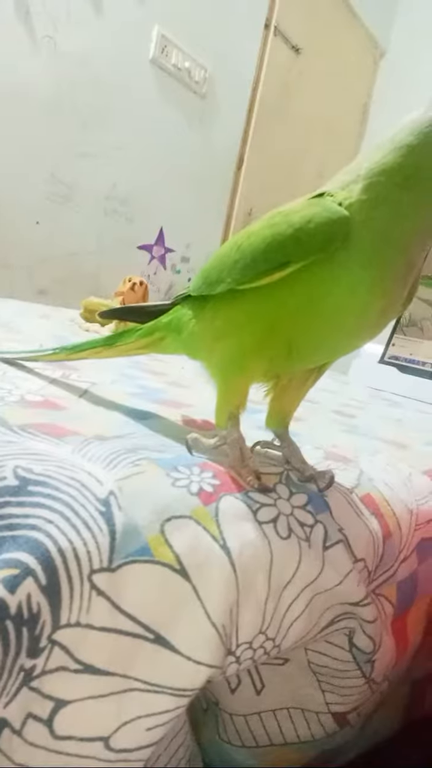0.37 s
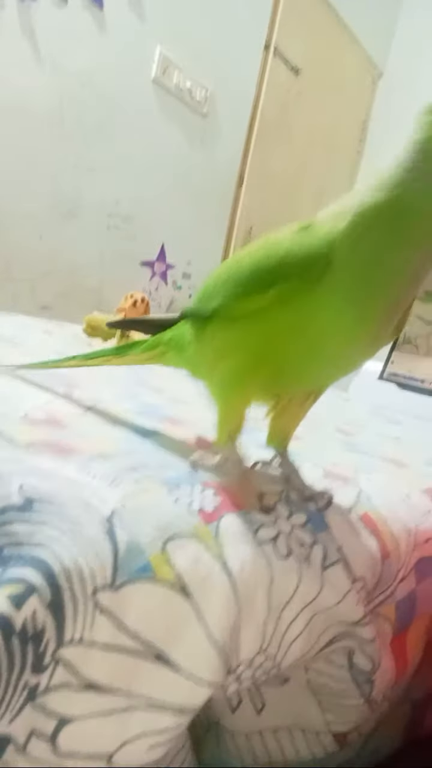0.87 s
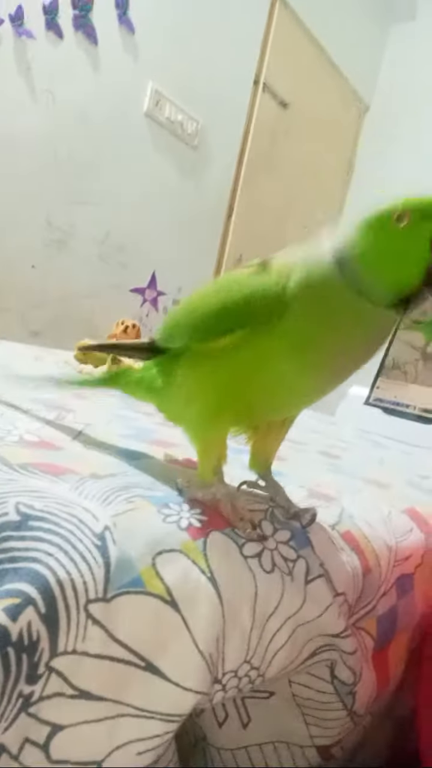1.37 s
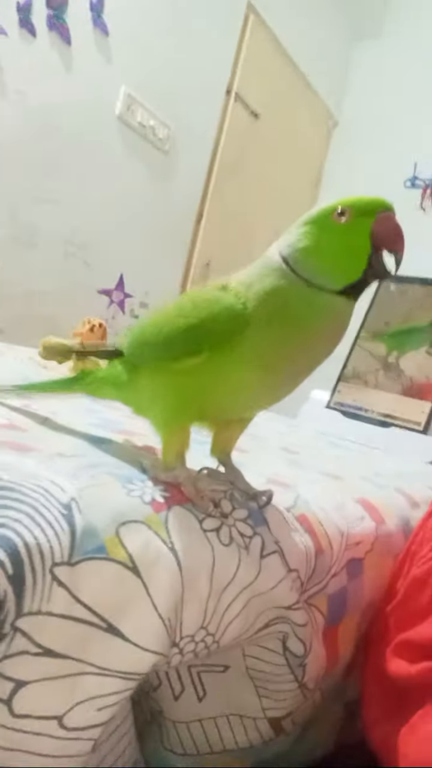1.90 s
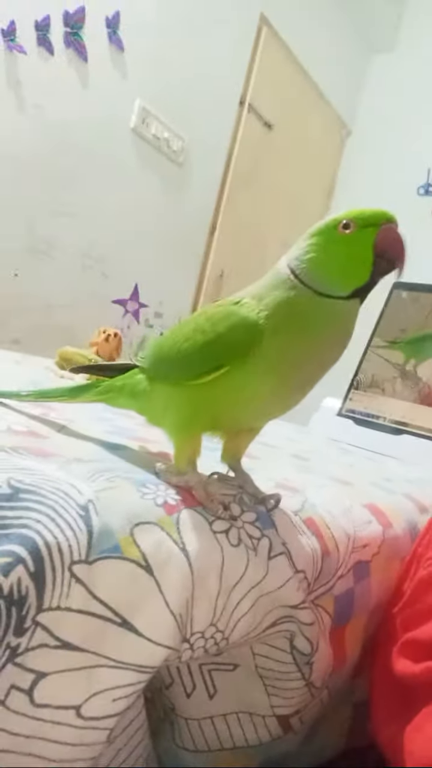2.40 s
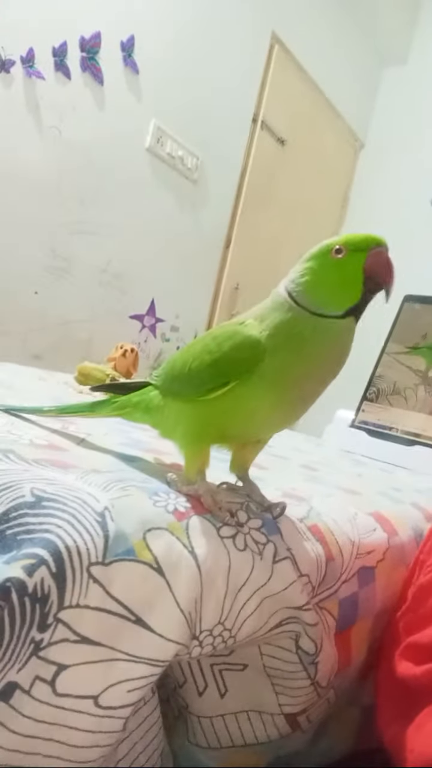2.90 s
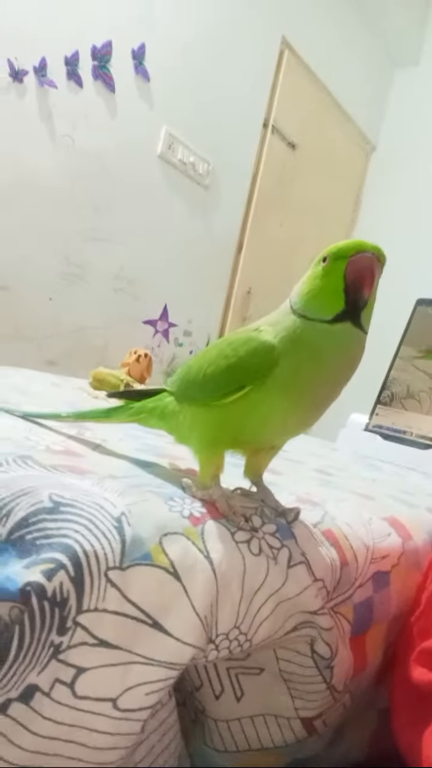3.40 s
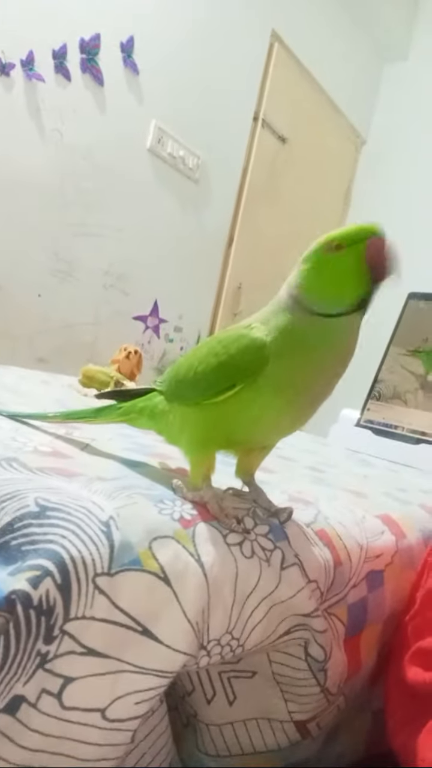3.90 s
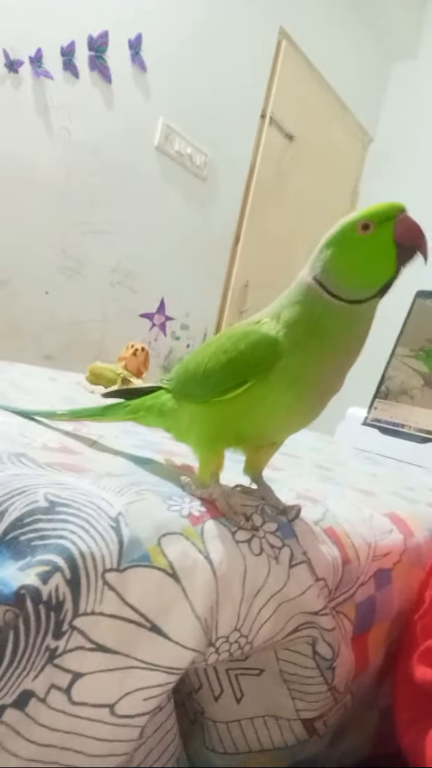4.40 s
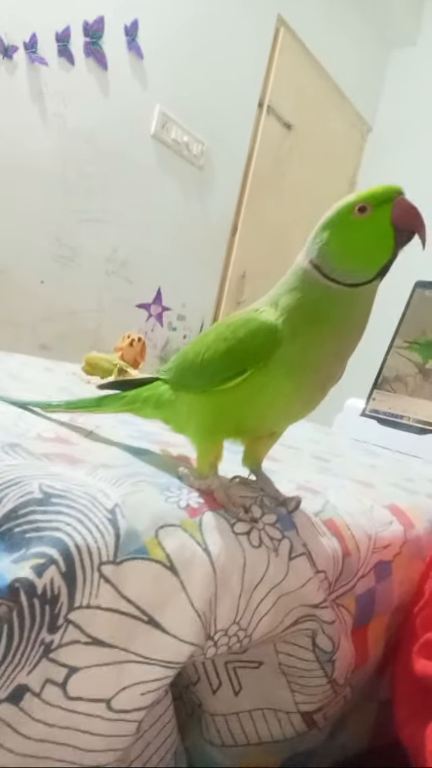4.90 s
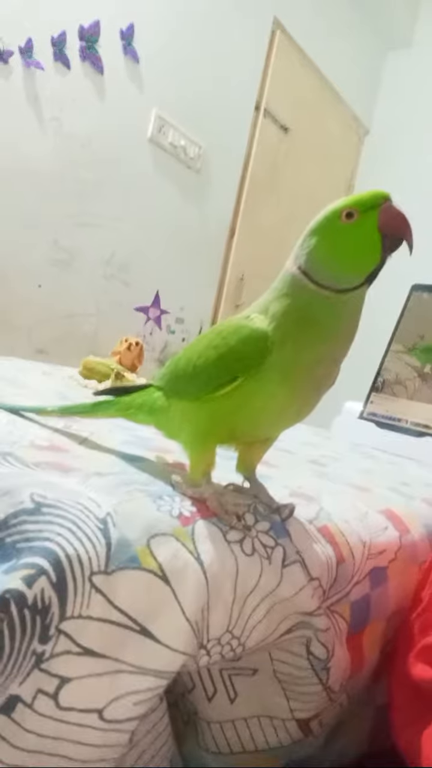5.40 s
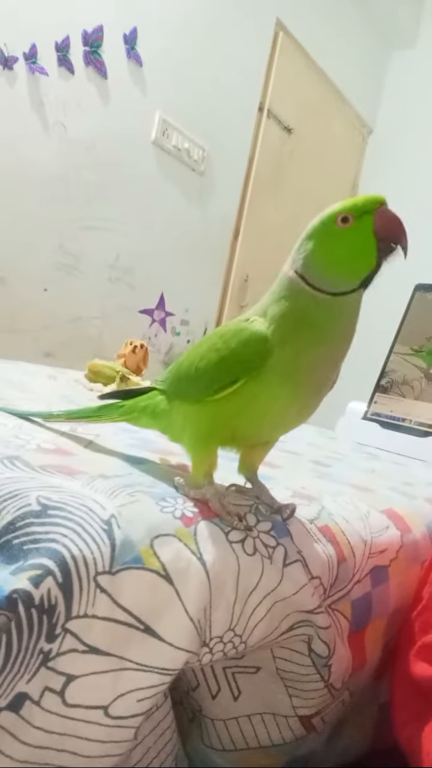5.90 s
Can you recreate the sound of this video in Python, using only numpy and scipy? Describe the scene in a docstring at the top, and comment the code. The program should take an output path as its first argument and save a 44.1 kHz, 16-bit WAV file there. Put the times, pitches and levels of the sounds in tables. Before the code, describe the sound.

A small bare-walled room, heard through a close phone microphone: very low room air, a faint unsteady hum, barely audible rustles and soft bumps. Slight single ticks come near 0.8 and 1.3 s. At about 1.37, 1.63 and 1.89 s a parrot gives three loud, piercing screeches, each under 0.2 s: a rapid upward sweep, a leap to a thin high whistle, then a drop into a rough, falling shriek. The first two crackle more; bright reflections trail after each. Quiet by 2.6 s. From 3.05 to 3.95 s soft, dry beak clicks come in five small clusters about 0.2 s apart, strongest near 3.55, with faint grinding. From 4.07 to 4.95 s five low, hollow clucks follow at the same pace, each a tiny slowing burst of throaty pulses with breathy air. Then near silence, a faint tick at 5.9, and at 5.99 s a fourth screech starts, cut off.

```python
"""A parakeet on a bed, close to a phone microphone in a small quiet room: three shrill screeches, the start
of a fourth, runs of soft beak clicks and five low clucks. Each screech is a stack of partials that rises,
jumps to a high whistle, then drops to a falling shriek. Clicks are struck damped rings; clucks are slowing
pulses that ring a throat. Bare walls throw the bird back over room air, a faint hum, rustles and bumps."""
import sys
import numpy as np
from scipy import signal
from scipy.fft import rfft, irfft
from scipy.io import wavfile
from scipy.ndimage import uniform_filter1d

SR = 44100
rng = np.random.default_rng(int(sys.argv[2]) if len(sys.argv) > 2 else 0)


def store_wav(level_fs):
    """Save 16-bit WAV to argv[1]."""
    pcm = np.round(np.clip(np.atleast_2d(level_fs), -1, 1) * 32767)
    wavfile.write(sys.argv[1], SR, pcm.T.astype(np.int16))


def volts(x):
    """Linear amplitude factor 10**(x/20) for a level x in dB, scalar or array-like."""
    e = np.asarray(x, float) / 20
    return 10 ** e


N = 266099  # length in samples

# spectrum of breath noise: f/Hz, relative level/dB
BREATH_HISS = [(300, -28), (1500, -3), (3000, 0.5), (5000, -25.5), (6300, -18.5), (7800, -6), (8600, 9.5),
               (9500, -2), (10300, -6), (11800, -2), (13000, -27)]
# spectrum of the top sizzle: f/Hz, relative level/dB
TOP_SIZZLE = [(9000, -42), (11600, -13.5), (12200, 3), (15700, -0.5), (16100, -29.5), (17000, -58.5)]


def evened(x):
    """Scales a sound to rms 1."""
    return x / np.sqrt(np.mean(x ** 2) + 1e-20)


def read(points, hz):
    """Reads a spectrum table over log frequency."""
    f, value = np.transpose(points)
    return np.interp(np.log(hz + 1), np.log(f + 1), value)


def along(points):
    """Draws a curve over the whole time from rows of t/s and value."""
    s, value = np.transpose(points)
    return np.interp(np.arange(N) / SR, s, value)


def add(mix, s, sound):
    """Mixes a sound in at s seconds, cut off where the mix ends."""
    part = mix[round(s * SR):][:len(sound)]
    part += sound[:len(part)]


def shaped(x, points):
    """Filters a sound by a spectrum table."""
    gain = volts(read(points, np.fft.rfftfreq(len(x), 1 / SR)))
    return irfft(rfft(x) * gain, len(x))


def coloured(points, size):
    """Noise of rms 1 with the given spectrum."""
    return evened(shaped(rng.standard_normal(size), points))


def wander(hz, size):
    """Slow random drift of rms 1, low-passed at hz."""
    lowpass = signal.butter(2, hz, fs=SR, output="sos")
    settled = signal.sosfilt(lowpass, rng.standard_normal(size + 2000))[2000:]
    return evened(settled)


def ring(modes, detune=1):
    """Damped sines struck at once, peak 1; the wider a mode, the faster it dies."""
    t = np.arange(900) / SR
    out = sum(volts(db) * np.exp(-np.pi * width * t) * np.sin(2 * np.pi * hz * detune * t)
              for hz, width, db in modes)
    return out / abs(out).max()


def course(start, jump, drop, end, rise_db, top_hz, upper_db, shriek_db):
    """The shared rise, whistle and shriek, stretched to the times of one screech."""
    # rise to the jump: share of the stage (0-1), pitch f/Hz, then level/dB of
    # fundamental, octave, upper partials, top sizzle
    rise = [(0, 658.8, -41, -45, -41, -53.5), (.25, 1232, -35.5, -24, -38, -45.5),
            (.62, 2080, -19.5, -24.5, -19, -35), (.85, 2562, -14.5, -27, -22.5, -28.5),
            (.96, 2732, -13, -32.5, -25, -28.5)]
    # high whistle: the same columns, but pitch as a share of its top
    whistle = [(.04, .985, -19, -48, -28, -20), (.4, 1.0, -16, -42, -29, -26),
               (.62, .975, -13, -41, -30, -25), (.82, .93, -8, -42, -30, -24),
               (.96, .87, -13, -48, -28, -28)]
    # falling shriek: the same columns as the rise
    shriek = [(.016, 2449, -14.5, -19.5, -22, -33), (.12, 2423, -18.5, -19.5, -20, -36.5),
              (.35, 2347, -16, -21, -22, -38), (.44, 2298, -30.5, -24, -17.5, -37.5),
              (.53, 2160, -20, -24.5, -19, -35.5), (.7, 2010, -23, -24, -17, -33),
              (.86, 1743, -26, -13.5, -19, -35), (.95, 1554, -35, -15.5, -27.5, -39),
              (1, 1467, -43.5, -31.5, -32.5, -43)]
    whistle = np.multiply(whistle, [1, top_hz, 1, 1, 1, 1])
    stages = [(np.add(rise, [0, 0, 0, rise_db, 0, 0]), start, jump),
              (whistle + [0, 0, 0, 0, upper_db, 0], jump, drop),
              (np.add(shriek, [0, 0, 0, shriek_db, 0, 0]), drop, end)]
    return np.array([(a + share * (b - a), *rest) for stage, a, b in stages for share, *rest in stage]).T


def screech(start, jump, drop, end, effort_db, low_db, colour):
    """Partials on one gliding pitch, fluttering in level, with hiss and a separate low crackle."""
    # weight of the upper partials by throat and microphone: f/Hz, level/dB
    upper_weight = [(2000, -5.5), (3600, 2.5), (5000, 2), (6300, -15.5), (7700, -18.5), (8800, 0.5),
                    (9600, -5), (10300, -15), (11500, -27), (12500, -25), (16000, -37.5)]
    # weight of the third partial by pitch: f/Hz, level/dB
    third_weight = [(600, 8), (1250, 8), (1600, -9), (2900, -9), (3100, 0)]
    # spectrum of the low crackle: f/Hz, relative level/dB
    crackle_spectrum = [(30, -44.5), (60, -22.5), (110, -4.5), (300, -3.5), (900, -2.5), (2000, -5),
                        (3000, -29), (6000, -70.5)]
    # bursts of low crackle at the microphone: middle t/s, length t/s, level/dB
    crackle_bursts = [(1.393, .014, -19), (1.442, .01, -21), (1.491, .032, -19.5), (1.521, .024, -18.5),
                      (1.656, .014, -31), (1.746, .02, -22), (1.777, .018, -22.5), (1.972, .02, -34),
                      (2.036, .03, -32)]
    s, *columns = course(start, jump, drop, end, *colour)
    t = np.arange(s[0], s[-1], 1 / SR)
    hz, first_db, octave_db, upper_db, sizzle_db = (np.interp(t, s, c) for c in columns)

    breaks = sum(volts(db) * np.cos(np.pi * np.clip((t - middle) / length, -.5, .5)) ** 2
                 for middle, length, db in crackle_bursts)
    growing = np.clip((t - start) / (jump - start), .05, 1)
    crackle_db = 20 * np.log10(volts(low_db) * growing + breaks)
    rough = np.clip(volts(crackle_db + 9), 0, 1)  # the voice shakes where the microphone crackles
    shaky = .5 * np.exp(-(t - t[0]) / .035)  # it starts rough and settles

    def flutter(depth):
        """Random level modulation of the given depth."""
        return 1 + depth * wander(350, len(t))

    # the voice thins in a pitch jump
    jumping = uniform_filter1d((abs(np.gradient(hz)) > 5) * 1., 60)
    first_db = first_db - 4 * jumping
    octave_db = octave_db - 25 * jumping
    upper_db = upper_db - 12 * jumping

    turn = 2 * np.pi * np.cumsum(hz * (1 + 0.0086 * wander(330, len(t)))) / SR
    voice = volts(first_db) * flutter(.08 + rough + shaky) * np.sin(turn)
    voice += volts(octave_db) * flutter(.16 + rough / 2 + shaky) * np.cos(2 * turn)
    for k in range(3, 12):
        partial_db = upper_db + read(upper_weight, k * hz) + read(third_weight, hz) * (k == 3)
        audible = k * hz < 16000
        voice += volts(partial_db) * audible * flutter(0.31 + 2 * shaky) * np.cos(k * turn)

    onset = volts(-29) * np.exp(-(t - t[0]) / 0.059)  # a puff of air opens the screech
    hiss = (volts(upper_db - 11.5) + onset) * coloured(BREATH_HISS, len(t))
    hiss += volts(sizzle_db) * coloured(TOP_SIZZLE, len(t))
    crackle = volts(crackle_db) * volts(2.7 * wander(120, len(t))) * coloured(crackle_spectrum, len(t))
    fade = signal.windows.tukey(len(t), 300 / len(t))
    return t[0], volts(effort_db) * fade * (np.sqrt(2) * voice + hiss), fade * crackle


def screeches():
    """All screeches on two tracks: the voice, and the low crackle that stays close to the microphone."""
    # start t/s, jump to the whistle t/s, drop to the shriek t/s, end t/s
    call_times = [(1.365, 1.4055, 1.4415, 1.537), (1.631, 1.6675, 1.7025, 1.791),
                  (1.888, 1.925, 1.9605, 2.055), (5.993, 6.0365, 6.072, 6.16)]
    # one row a screech: effort level/dB, low crackle level/dB
    efforts = [(.5, -34.5), (.5, -34.5), (.5, -40), (.5, -45.5)]
    # one row a screech, levels against the shared stages: octave of the rise level/dB,
    # top of the whistle f/Hz, its upper partials level/dB, octave of the shriek level/dB
    voices = [(0, 3850, 6.5, 2), (1.5, 3770, -1, 0.5), (-0.5, 3680, -4.5, -1.5), (4, 3750, 0, 0)]
    bird, near = np.zeros(N), np.zeros(N)
    for times, effort, colour in zip(call_times, efforts, voices):
        s, voice, crackle = screech(*times, *effort, colour)
        add(bird, s, voice)
        add(near, s, crackle)
    return bird, near


def clicks():
    """The beak halves catch and let go, ringing the horn; finer grains swell around the catches."""
    # the clearer clicks: t/s, peak level/dB before the filters, treble level/dB against the low ring
    clear_clicks = [(0.788, -53, -11), (1.2894, -52, -10), (2.942, -53, -19), (3.0638, -51, -17),
                    (3.0778, -48, 0), (3.1152, -42, -13), (3.1314, -45, -19), (3.1355, -35, -22),
                    (3.1405, -38, -23), (3.1483, -41, -23), (3.155, -41, -28), (3.3154, -40, -11),
                    (3.3309, -41, -16), (3.3363, -37, -14), (3.3425, -32, -19), (3.3543, -33, -18),
                    (3.5145, -39, -15), (3.53, -41, -19), (3.5357, -33, -18), (3.5454, -27, -14),
                    (3.5555, -32, -15), (3.7174, -45, -12), (3.7353, -35, -24), (3.7414, -35, -19),
                    (3.7488, -34, -24), (3.7552, -41, -22), (3.9196, -45, -22), (5.894, -46, -15)]
    # rings of the horn: f/Hz, width f/Hz, level/dB
    horn = [(1550, 560, -1.5), (2800, 600, 3), (4700, 900, -14)]
    # its treble rings: f/Hz, width f/Hz, level/dB
    horn_treble = [(7600, 410, -4.5), (8600, 1100, 1), (12650, 1800, -2)]
    # the clicks are hollow between their rings: f/Hz, level/dB
    hollow = [(3600, 1.5), (4100, -9), (5000, 0), (6300, -10), (7400, -3), (8400, 0.5)]
    # fainter clicks fall by chance while the beak works, 3.05 to 3.92 s
    faint = [(3.05 + (3.92 - 3.05) * when, -54 + 3 * (2 * size - 1), -14)
             for when, size in rng.random((26, 2))]
    rows = clear_clicks + faint
    out, grip = np.zeros(N), np.zeros(N)
    for (s, db, treble_db), luck in zip(rows, rng.standard_normal((len(rows), 4))):
        modes = [(hz, width, level + 1.5 * r) for (hz, width, level), r in zip(horn, luck)]
        click = ring(modes, 1 + 0.0085 * luck[3])
        click += volts(treble_db) * ring(horn_treble, 1 + 0.023 * luck[0])
        click *= np.minimum(np.arange(900) / 6, 1)  # the horn takes a moment to let go
        add(out, s, -volts(db) * click / abs(click).max())
        add(grip, s - .03, volts(db) * np.hanning(2650))
    # fine grinding, about 2500 grains a second
    grains = rng.standard_normal(N) * (rng.random(N) < 2500 / SR)
    scrape = signal.fftconvolve(grains, ring(horn) + 0.5 * ring(horn_treble))[:N]
    beak = shaped(out + volts(-28) * grip * scrape, hollow)
    return signal.sosfilt(signal.butter(2, 900, "high", fs=SR, output="sos"), beak)


def cluck(row, count, lead):
    """Slowing pulses ring a throat that deepens; a rasp fades from the first; air hisses through."""
    # throat resonances: f/Hz, width f/Hz, level/dB
    throat_modes = [(330, 380, -7), (600, 600, 0)]
    # sharp snap of a pulse: f/Hz, width f/Hz, level/dB
    snap_modes = [(1930, 440, 26), (2894, 3300, -8)]
    s, gap_ms, growth, peak_db, snap_db = row
    k = np.arange(count)
    gaps_ms = gap_ms * growth ** (k - 1.) * (k > 0)
    at = np.round(np.cumsum(gaps_ms) * SR / 1000).astype(int)
    out = np.zeros(at[-1] + 1200)
    luck = rng.standard_normal((count, 3))
    for i in k:
        throat = ring(throat_modes, growth ** (0.043 * (count - 2 - i)))
        # pulses swell by 0.75 dB each, give or take; the first is mostly snap
        body_db = peak_db - .75 * (count - 3 - i) + luck[i, 0] - 5.6 * (i == 0)
        snap = volts(snap_db - 2.2 * i + 2.4 * luck[i, 1]) * ring(snap_modes, 1 + 0.11 * luck[i, 2])
        # short windows soften the attacks
        add(out, (at[i] + 330) / SR, np.convolve(volts(body_db) * throat, np.hanning(24) / 11))
        add(out, (at[i] + 330) / SR, np.convolve(snap, np.hanning(8) / 3.5))
    puff = np.interp(np.arange(len(out)), [0, 290, 350, at[-1] + 360, at[-1] + 520, len(out)],
                     [lead / 2, lead, 0.89, 0.7, 0.08, 0])
    rasp = signal.fftconvolve(rng.standard_normal(len(out)), ring(snap_modes))[:len(out)]
    air_flow = volts(-25.5 + snap_db + 8.5) * evened(rasp)
    air_flow += volts(-29.5) * coloured(BREATH_HISS, len(out))
    air_flow += volts(-34) * coloured(TOP_SIZZLE, len(out))
    out += puff * air_flow
    highpass = signal.butter(2, 190, "high", fs=SR, output="sos")
    return s - .008, signal.sosfiltfilt(highpass, out)  # the air leads the first pulse


def clucks():
    """The low clucks, each a burst of throat pulses."""
    # pulse train: first pulse t/s, first gap t/ms, gap growth (ratio), body level/dB, snap level/dB
    pulse_trains = [(4.0724, 1.9, 1.105, -4, -11), (4.2890, 1.55, 1.155, -6.5, -11),
                    (4.4889, 1.55, 1.158, -6, -14), (4.6883, 2.15, 1.17, -6.5, -17),
                    (4.9024, 1.95, 1.157, -8.5, -16)]
    # one entry a cluck: number of pulses
    pulse_counts = [8, 7, 8, 6, 7]
    # one entry a cluck: air that already flows before the first pulse (share)
    air_leads = [.3, .06, .05, .05, .05]
    out = np.zeros(N)
    for row, count, lead in zip(pulse_trains, pulse_counts, air_leads):
        add(out, *cluck(row, count, lead))
    return out


def echoes():
    """Dense echoes of random sign after 7 ms, each band dying at its own speed."""
    # decay time of the room: f/Hz, fall by 60 dB t/s
    decay_times = [(200, 0.43), (530, 0.32), (1390, 0.52), (3680, 0.66), (9000, 0.39), (11000, .3),
                   (14000, 0.35)]
    # colour of the echoes: f/Hz, level/dB
    wall_colour = [(100, -16.5), (270, 3.5), (700, -4.5), (1300, 0), (2300, -4), (3000, -9.5), (3700, -6.5),
                   (4200, -4), (4800, -12), (7000, 5.5), (9000, 0), (14000, -5)]
    taps = np.zeros(SR)
    at = np.arange(300, SR - 20, 20)
    taps[at + rng.integers(0, 20, len(at))] = rng.choice([-1., 1.], len(at))
    hz, t, z = signal.stft(taps, SR, nperseg=256)
    decay = volts(-60 * t / read(decay_times, hz)[:, None])
    tail = signal.istft(z * decay, SR, nperseg=256)[1][:SR]
    return volts(-9) * shaped(tail, wall_colour) / np.linalg.norm(tail)


def room(x):
    """The head keeps moving, so the sound passes among three echo patterns; low standing waves ring on."""
    # standing waves: f/Hz, width f/Hz, relative level/dB
    standing_waves = [(275.5, 7, -3.5), (330, 4.4, -16), (656, 19, -10), (769.3, 26, -5)]
    sway = np.pi * 45 * np.arange(N) / SR
    out = np.zeros(N)
    for k in range(3):
        facing = np.sqrt(2 / 3) * np.cos(sway + k * np.pi / 3)
        out += signal.fftconvolve(x * facing, echoes())[:N]
    t, standing = np.arange(SR) / SR, np.zeros(SR)
    for hz, width, db in standing_waves:
        build_up = np.minimum(t / 0.0083, 1)
        wave = np.exp(-np.pi * width * t) * np.sin(2 * np.pi * hz * t) * build_up
        standing += volts(-24 + db) * wave / np.linalg.norm(wave)
    return out + signal.fftconvolve(x, standing)[:N]


def air():
    """Room air that drifts in patches, a low wavering hum, faint rustles and a few soft bumps."""
    # spectrum of the room air: f/Hz, relative level/dB
    air_spectrum = [(18, -50.5), (30, -17.5), (134, -5.5), (233, -7.5), (404, -3), (461, -9), (616, -4),
                    (721, -6), (889, -8), (1280, -10), (3220, -19.5), (4420, -32.5), (6300, -35),
                    (7800, -31), (8700, -23.5), (10000, -31.5), (16000, -38.5)]
    # level of the room air: t/s, level/dB
    air_level = [(0.0, -71), (1.3, -71), (2.6, -68), (2.86, -73), (3.3, -69), (4.0, -69), (5.97, -70.5)]
    # the hum wavers: t/s, level/dB
    hum_level = [(0.0, -66), (0.128, -82), (0.492, -67), (0.684, -79), (0.762, -58), (0.848, -74),
                 (0.962, -66), (1.036, -74), (1.24, -62), (1.31, -83), (2.12, -75), (2.268, -55),
                 (2.348, -67), (2.85, -86), (3.012, -78), (3.9, -89), (5.55, -88), (5.97, -71.5)]
    # faint rustles: t/s, length t/s, level/dB
    rustles = [(0.362, 0.13, -78), (.76, 0.11, -76.5), (1.275, .07, -76), (5.35, .14, -78.5)]
    # soft low bumps: t/s, peak level/dB, f/Hz
    bumps = [(0.683, -60, 303), (0.778, -64, 218), (2.24, -65, 252.3), (2.732, -63, 253),
             (3.913, -59.5, 246.6)]
    hz, t, z = signal.stft(coloured(air_spectrum, N), SR, nperseg=512)
    across_bands = uniform_filter1d(rng.standard_normal(z.shape), 10, 0)
    patches = evened(uniform_filter1d(across_bands, 12, 1))
    drifting = signal.istft(z * volts(1.4 * patches), SR, nperseg=512)[1][:N]
    out = volts(along(air_level)) * evened(drifting)
    turn = 2 * np.pi * np.cumsum(140 + 7 * wander(30, N)) / SR  # hum near 140 Hz
    out += volts(along(hum_level) + 2 * wander(7.7, N)) * np.sin(turn)
    for s, length, db in rustles:
        size = round(length * SR)
        add(out, s, volts(db + 3.2 * wander(60, size)) * np.hanning(size) * coloured(BREATH_HISS, size))
    for s, db, hz in bumps:
        add(out, s, volts(db) * np.hanning(1100) * np.sin(2 * np.pi * hz * np.arange(1100) / SR))
    return out


def scene():
    """The bird close by, its return from the walls, and the air of the room."""
    # share of the clucks that reaches the walls: f/Hz, level/dB
    cluck_send = [(200, -5.5), (800, 1.5), (2000, -9), (3600, -6.5), (4800, -5), (6500, -8.5), (9000, -8.5),
                  (14000, -2)]
    bird, near = screeches()
    beak = clicks()
    low_clucks = clucks()
    walls = room(bird + volts(-1) * beak + shaped(low_clucks, cluck_send))
    return (bird + beak + low_clucks + near + walls + air())[None]


def low_pass(x):
    """Removes everything above the highest recorded frequency."""
    return signal.sosfilt(signal.butter(12, 16690, fs=SR, output="sos"), x)


def record(dry):
    """The microphone drops the deep bass, rounds off the loudest peaks and ends near 16 kHz."""
    thin = signal.sosfilt(signal.butter(3, 60, "high", fs=SR, output="sos"), dry)
    rounded = 1.38 * np.tanh(thin / 1.217)
    edge = signal.firwin(255, 16200, window=("kaiser", 8), fs=SR)[None]
    mix = signal.oaconvolve(rounded, edge, "same")
    return low_pass(mix)


dry = scene()
out = record(dry)
store_wav(out)
```